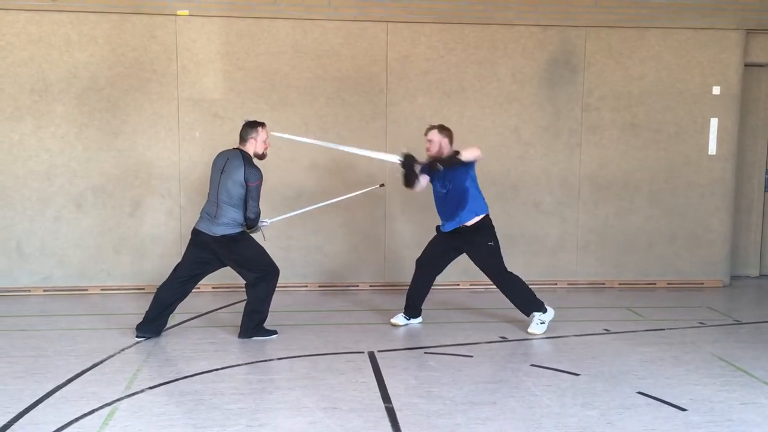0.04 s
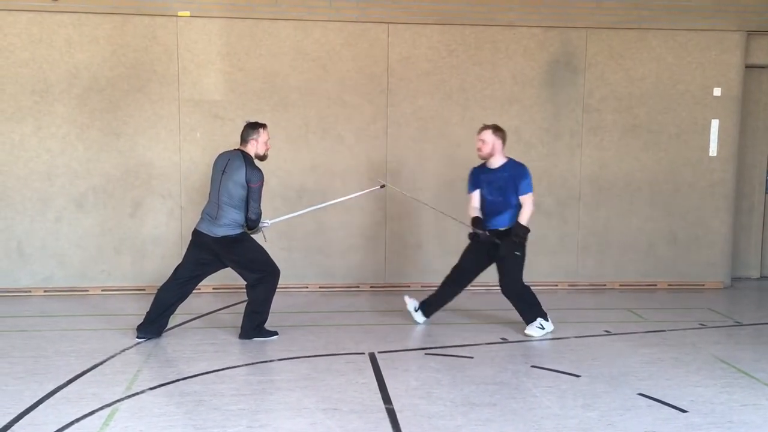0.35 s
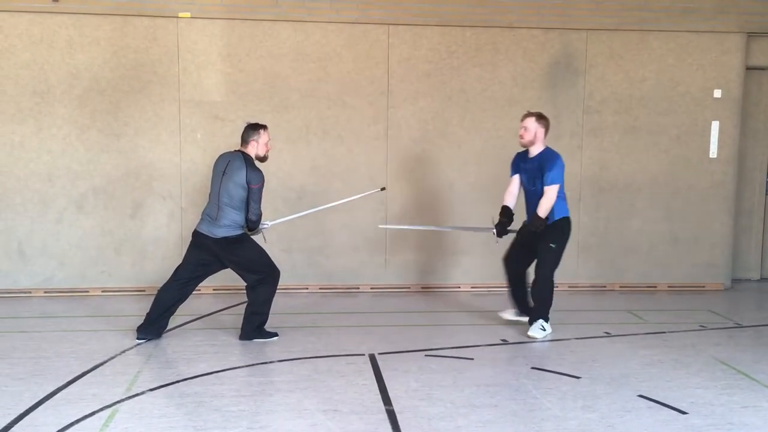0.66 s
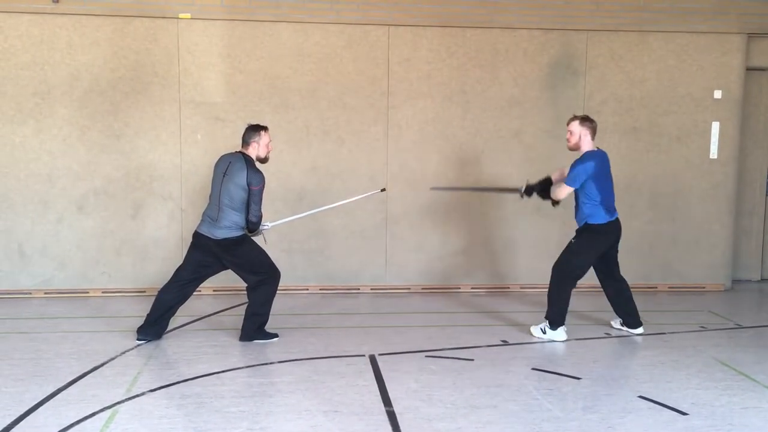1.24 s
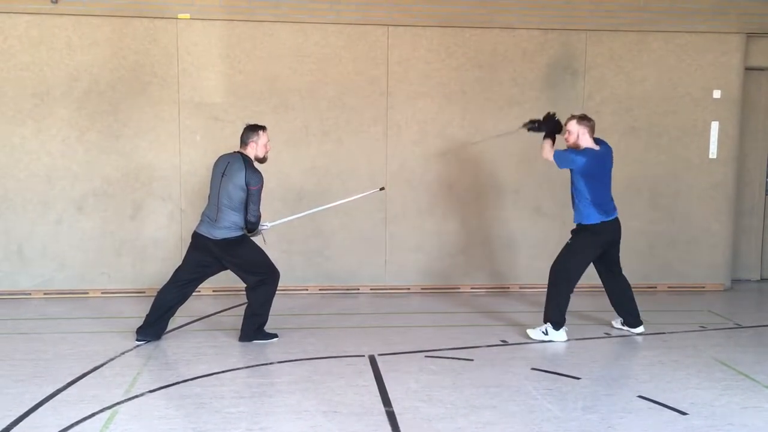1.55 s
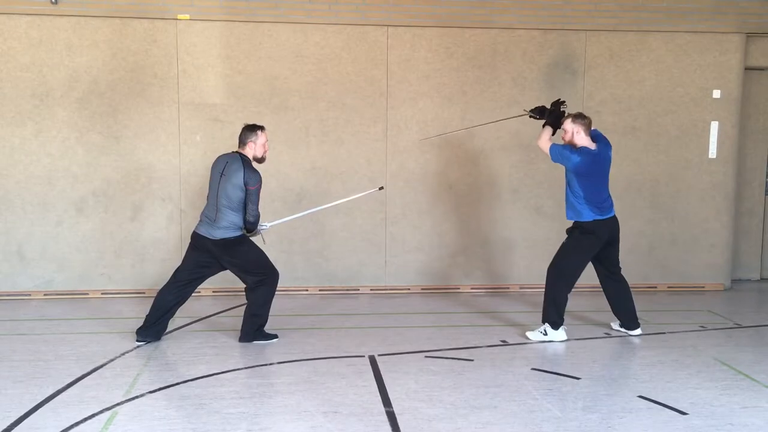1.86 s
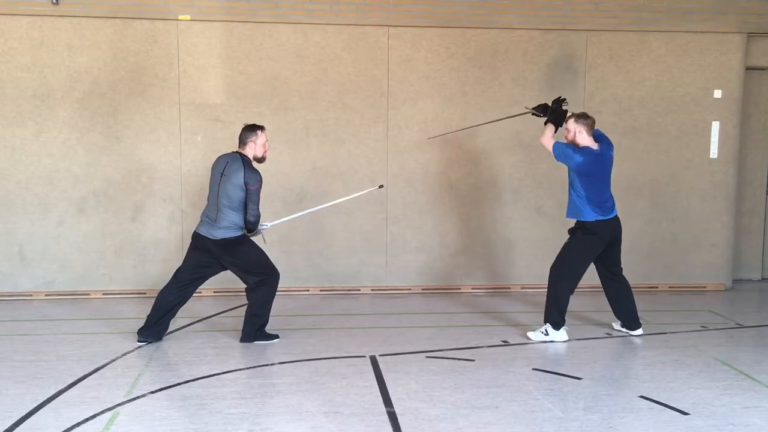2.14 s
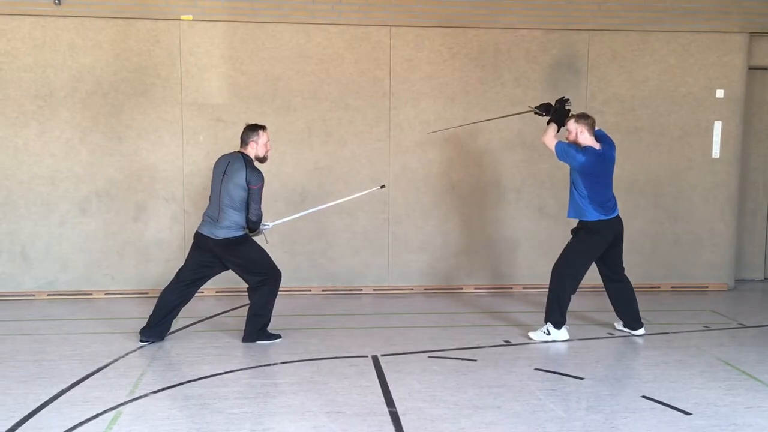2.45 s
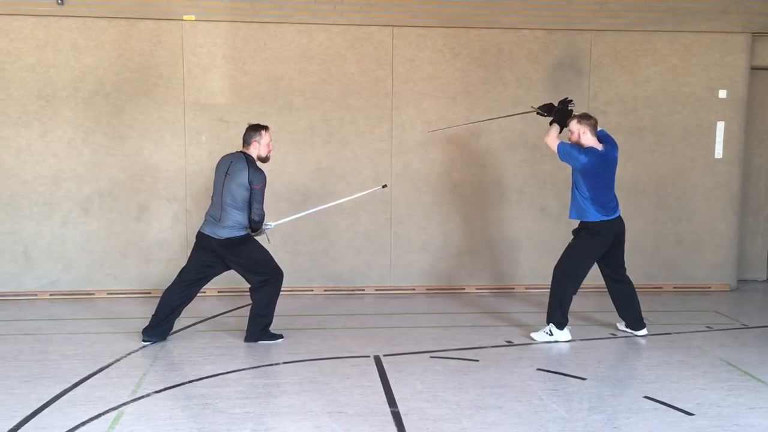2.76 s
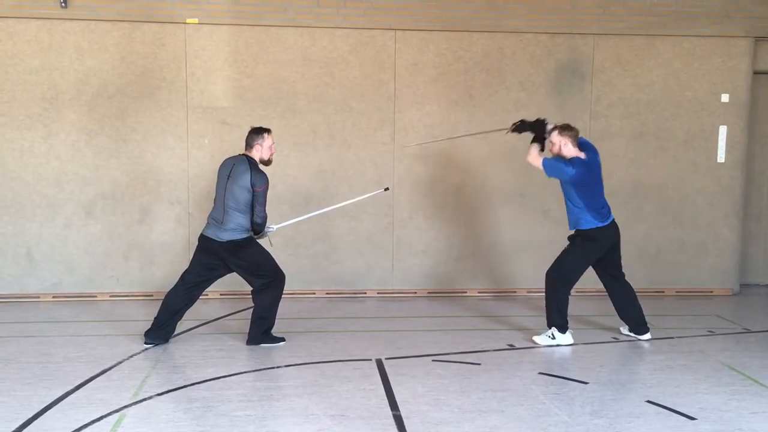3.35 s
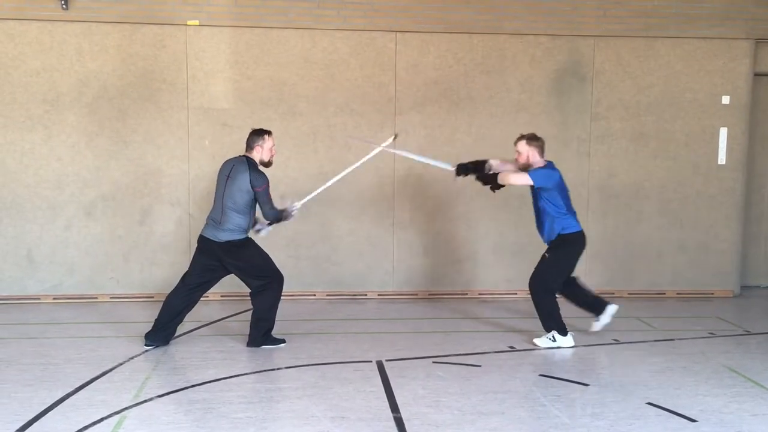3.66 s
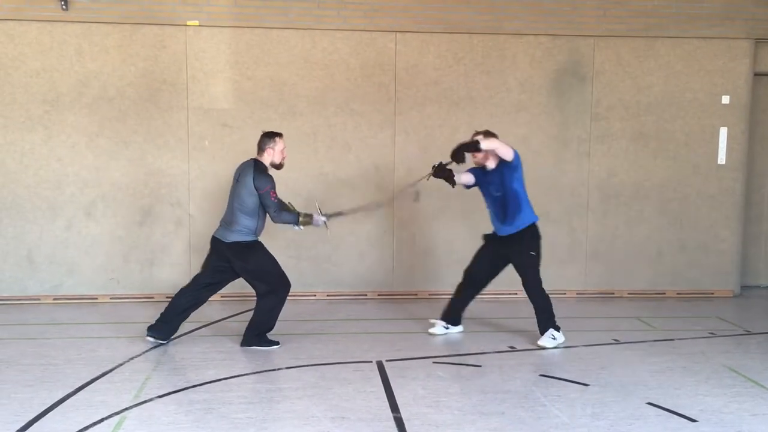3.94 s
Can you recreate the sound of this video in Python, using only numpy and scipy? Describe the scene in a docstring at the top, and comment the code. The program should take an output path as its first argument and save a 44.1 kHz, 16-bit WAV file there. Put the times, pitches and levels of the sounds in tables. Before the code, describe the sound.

Two steel swords clash once, ringing through a gym hall after soft footsteps.

```python
"""Fencing drill in a gym

Two fencers drill with steel swords in a gym hall, where the ventilation hums.
One steps back softly with rustling clothes, waits, then cuts: the blades meet in one bright clash.
The steel rings with many tones at once, and the hall scatters and prolongs the sound."""
import sys
import numpy as np
from scipy import signal
from scipy.fft import rfft, irfft, next_fast_len
from scipy.io import wavfile
from scipy.ndimage import map_coordinates

SR = 44100
rng = np.random.default_rng(int(sys.argv[2]) if len(sys.argv) > 2 else 0)


def transcribe(u):
    """Save the signal u as a 16-bit wav file named by the first command-line argument.

    u: samples, shape (n,) or (channels, n), limited to [-1, 1]; the rate is SR.
    q: integer samples, one column per channel.
    """
    v = np.clip(np.atleast_2d(u).T, -1, 1)
    q = np.round(v * 32767).astype(np.int16)
    wavfile.write(sys.argv[1], SR, q)


N = 176400
CLASH_S, FIRST_WALL_S = 3.8035, 0.009  # when the blades meet; delay of the first echo
CLASH_RIPPLE_DB = 3.5  # peaks and dips of tightly packed resonances


def amp(db):
    """Turn decibels into a gain."""
    return 10 ** (np.asarray(db) / 20)


def unit(x):
    """Scale x to an average (rms) level of 1."""
    return x / np.sqrt(np.mean(np.abs(x) ** 2) + 1e-20)


def along(points, hz):
    """Read a table of (frequency, value) at hz, on a log frequency axis."""
    freqs, values = np.transpose(points)
    return np.interp(np.log(hz + 1), np.log(freqs + 1), values)


def since(s):
    """Seconds since time s at each sample, zero before it."""
    return np.maximum(np.arange(N) / SR - s, 0)


def strike(s, rise_s, t60):
    """Loudness of a hit at time s: a quick rise, and a fade of 60 dB in t60 seconds."""
    return (1 - np.exp(-since(s) / rise_s)) * amp(-60 * since(s) / t60)


def wobble(rate, size=N):
    """A smooth curve through `rate` random values a second."""
    return map_coordinates(rng.standard_normal(2000), [np.arange(size) * rate / SR], mode="mirror")


def filtered(x, response):
    """Scale each frequency in x by response(hz)."""
    size = next_fast_len(N + SR // 2)
    return irfft(rfft(x, size) * response(np.fft.rfftfreq(size, 1 / SR)), size)[:N]


def noise(colour, edge_hz=SR, ripple_db=0, ripple_hz=60.63):
    """Noise of rms 1 shaped by a colour table, duller above edge_hz, with random peaks and dips."""
    bumps = rng.standard_normal(4000)

    def response(hz):
        ripple = ripple_db * map_coordinates(bumps, [hz / ripple_hz], order=1, mode="mirror")
        return amp(along(colour, hz) + ripple) / np.hypot(1, (hz / edge_hz) ** 2)
    return unit(filtered(rng.standard_normal(N), response))


# How long the hall takes to fade by 60 dB: f/Hz, fade time/s
HALL_FADE = [(200, 1.5), (700, 1.55), (2000, 2.24), (4500, 2.04), (8500, 0.7), (12000, .55), (15000, 0.68)]
def hall_fade(x, s):
    """From time s on, each frequency of x dies away at the hall's own rate."""
    hz, t, spectra = signal.stft(x, SR, nperseg=256)
    fade = amp(-60 * np.maximum(t - s, 0) / along(HALL_FADE, hz)[:, None])
    return signal.istft(spectra * fade, SR)[1][:N]


def hall_echo(x):
    """Many reflections blur into one echo with about the same energy as x."""
    tail = hall_fade(rng.standard_normal(N), 0) * (since(FIRST_WALL_S) > 0)
    return signal.fftconvolve(x, tail / np.linalg.norm(tail))[:N]


# Tones of the fan: multiple of its pitch, base level/dB
FAN_TONES = [(1, -59.5), (2, -66), (3, -55), (4, -59.5), (5, -67)]
# Slow swell of the hum: t/s, gain/dB
FAN_SWELL = [(0, -2), (1.6, -0.5), (2.2, 0), (3.1, 0.5), (4, -0.5)]
# Colour of the moving air: f/Hz, relative level/dB
AIR_COLOUR = [(20, -36.5), (38, -10), (55, 0.5), (85, 2.5), (110, 2), (180, 3), (260, 4.5), (350, 1),
              (410, -12.5), (480, -7.5), (560, -3), (680, -11), (810, -5.5), (920, -12), (1130, -5.5),
              (1400, -13), (2050, -15.5), (2450, -14), (3000, -20.5), (4000, -22.5), (5200, -28),
              (7400, -36.5), (8400, -32), (12000, -36.5), (13500, -43), (15800, -61)]
def ventilation(fan_hz=74.85):
    """A fan hums, wavering slightly, over the rush of air."""
    t = since(0)
    hum = np.zeros(N)
    for multiple, db in FAN_TONES:
        peak = np.sqrt(2) * amp(db + 1.02 * wobble(4.4))
        phase = 2 * np.pi * (multiple * fan_hz * t + rng.random())
        hum += peak * np.sin(phase + 0.19 * wobble(3.65))
    swell = amp(np.interp(t, *np.transpose(FAN_SWELL)))
    return hum * swell + amp(-56) * noise(AIR_COLOUR, ripple_db=2.03)


# Body movements: t/s, length/s, level/dB
MOVES = [(.01, 0.064, -69), (0.113, 0.14, -69.5), (0.308, .05, -73), (0.425, 0.16, -75.5), (.63, 0.11, -80),
         (0.984, .13, -67), (1.144, .22, -69.5), (1.38, 0.2, -77), (1.785, 0.11, -68.5),
         (2.487, 0.064, -73.5), (3.163, 0.031, -71), (3.56, 0.062, -68.5), (3.665, 0.21, -76)]
# Colour of rubbing cloth: f/Hz, relative level/dB
CLOTH_COLOUR = [(500, -41), (2000, -13.5), (4000, 1.5), (6500, 1.5), (7400, -5), (8700, 0), (12000, -1.5),
                (13500, -5), (15500, -7)]
def clothes(rise_s=0.023, fall_s=0.038):
    """Fabric slides with each move: a faint, uneven hiss."""
    loudness = sum(amp(db) * (1 - np.exp(-since(s) / rise_s)) * np.exp(-since(s + length) / fall_s)
                   for s, length, db in MOVES)
    return noise(CLOTH_COLOUR) * loudness * amp(0.27 * wobble(65))


# Shoe taps: t/s, level/dB
TAPS = [(0.192, -51.5), (.267, -47.5), (0.873, -60), (1.133, -47.5), (1.192, -55), (1.632, -52.5),
        (3.376, -66)]
# Colour of a tap: f/Hz, relative level/dB
TAP_COLOUR = [(80, 5), (250, -13), (600, 6), (1300, 4.5), (3500, -8.5), (6000, -20.5), (14000, -36)]
# Weight landing on the floor: t/s, level/dB, f/Hz
LANDINGS = [(.3, -50.5, 130), (.62, -53, 79.5), (0.859, -53, 240), (.955, -47.5, 245), (1.135, -48, 139),
            (1.3, -46, 140), (1.66, -48, 75), (2.12, -48, 70.5), (2.19, -54, 65), (3.85, -47.5, 170),
            (3.935, -46, 95)]
# Colour of a thud: multiple of the landing's frequency, relative level/dB
THUD_COLOUR = [(.3, -24), (.7, -9), (1, 16), (1.4, 4.5), (3, -35), (10, -58)]
# Shuffling soles, heard through the hall: t/s, base level/dB
SHUFFLE_LEVELS = [(0, -58.5), (.28, -60.5), (.5, -59), (.85, -60), (1.05, -59.5), (1.17, -56), (1.45, -63),
                  (1.65, -68), (2, -65), (3.3, -64.5), (3.75, -63.5)]
# Colour of the shuffling: f/Hz, relative level/dB
SCUFF_COLOUR = [(100, -13.5), (250, 9.5), (500, -2), (1200, -5), (2500, -16), (5000, -23.5), (12000, -29)]
def footwork():
    """Soft soles tap and shuffle, and the springy floor thuds under the weight."""
    taps = noise(TAP_COLOUR) * sum(amp(db) * strike(s, rise_s=0.00034, t60=0.045) for s, db in TAPS)
    thuds = np.zeros(N)
    for s, db, hz in LANDINGS:
        colour = [(multiple * hz, level) for multiple, level in THUD_COLOUR]
        thuds += amp(db) * noise(colour) * strike(s, rise_s=0.0033, t60=0.32)
    shuffle_db = 0.5 + np.interp(since(0), *np.transpose(SHUFFLE_LEVELS))
    shuffle = noise(SCUFF_COLOUR) * amp(shuffle_db)
    return taps + amp(-0.5) * hall_echo(taps) + thuds + shuffle


# Colour of the first echoes from wall and floor: f/Hz, relative level/dB
EARLY_COLOUR = [(300, -32), (600, -10), (2400, 1), (3500, -1), (5000, -4), (7000, 5), (9000, 1), (12000, 5),
                (14000, 1), (15600, -4)]
# Starting colour of the long echo: f/Hz, relative level/dB
WASH_COLOUR = [(150, -9), (460, -14), (620, -1.5), (1000, -2.5), (1280, -8.5), (1650, -1.5), (2200, -5),
               (3200, -6.5), (3900, -2.5), (4400, -0.5), (4620, -13), (4800, -1), (5400, 1.5), (5750, -5),
               (6200, 4.5), (7400, -1), (7770, -3), (8500, 6), (9700, 6.5), (10400, 0), (11050, 8),
               (11600, 5.5), (12400, 2), (14000, -2), (15500, -10)]
def clash_echo():
    """The nearest walls throw the clash back, then the whole hall answers with a long wash."""
    echo_s = CLASH_S + FIRST_WALL_S
    early = noise(EARLY_COLOUR, ripple_db=CLASH_RIPPLE_DB) * strike(echo_s, rise_s=0.00082, t60=0.2)
    wash = hall_fade(noise(WASH_COLOUR, ripple_db=CLASH_RIPPLE_DB), CLASH_S)
    wash_rise = 1 - np.exp(-since(echo_s) / 0.0064)
    return amp(-28) * early + amp(-25) * wash * wash_rise


# Ringing tones of the two blades: f/Hz, level/dB, fade time before stretching/s
BLADE_TONES = [(853, -46, .8), (974, -46, .8), (1100, -42, .8), (1341, -47, .6), (1703, -48, .7),
               (2007, -44, 1.3), (2473, -42, .6), (2562, -45, .9), (2807, -47, .8), (3088, -44, .9),
               (3539, -46, 1.3), (4034, -45, 1.4), (4155, -44, 1.1), (4497, -45, 1.3), (4721, -44, 1),
               (4982, -42, 1.1), (5011, -42, 1.1), (5123, -41, 1.5), (5515, -47, 1), (6005, -40, .8),
               (6070, -39, .8), (6099, -39, .8), (6653, -47, .9), (6998, -44, .6), (7165, -45, .6),
               (7579, -46, .6), (8115, -42, .7), (8330, -44, .7), (8457, -43, .7), (8560, -41, .6),
               (8858, -43, .6), (9156, -43, .6), (9436, -45, .6), (9645, -42, .6), (9684, -39, .65),
               (9790, -43, .6), (10216, -41, .5), (10751, -31.5, .55), (10795, -36, .55), (11463, -42, .45),
               (11750, -38, .4), (11880, -35, .42), (11927, -34, .6), (12648, -43, .35), (15400, -40, .25),
               (15474, -38, .3)]
def blade_ring(stretch=1.31, build_s=0.011, scatter=0.94, flutter_per_s=110):
    """The steel rings on; reflections join each tone and make it swell and flutter."""
    size = N - round(CLASH_S * SR)
    t = np.arange(size) / SR
    ring = np.zeros(size)
    for hz, db, t60 in BLADE_TONES:
        loudness = (1 - np.exp(-t / build_s)) * amp(-60 * t / (stretch * t60))
        # A complex gain shifts both the strength and the phase of the tone.
        reflections = scatter * (wobble(flutter_per_s, size) + 1j * wobble(flutter_per_s, size))
        steady = np.exp(2j * np.pi * (hz * t + rng.random()))
        tone = np.imag((1 + reflections) * steady) * loudness
        ring += amp(db) * unit(tone) * np.sqrt(np.mean(loudness ** 2))
    return np.pad(ring, (N - size, 0))


# The edges touching: t/s, level/dB, treble edge f/Hz
BLADE_HITS = [(3.8047, -10, 20000), (3.8062, -13, 5400)]
# Colour of each crack: f/Hz, relative level/dB
CRACK_COLOUR = [(60, -43), (300, -28), (480, -19), (620, -7), (1200, -10), (2400, 7.5), (4500, 5),
                (7000, -4), (10000, 3), (13000, 9), (15500, 4.5)]
# Colour of the crash, a crowd of weak, short blade tones: f/Hz, relative level/dB
CRASH_COLOUR = [(60, -42), (150, -18), (300, -15), (480, -29), (600, 16.5), (1100, -2), (1400, -17),
                (2300, 4), (3500, -7), (5000, 3), (7700, -17), (9000, -14), (11000, -11), (12500, 8),
                (14000, 1), (15800, 3)]
def blade_clash(knock_hz=613, bass_cut_hz=514):
    """Edge cracks on edge; the blades bend with a low knock and shake with a short crash."""
    cracks = sum(amp(db) * noise(CRACK_COLOUR, edge_hz) * strike(s, rise_s=0.0002, t60=0.007)
                 for s, db, edge_hz in BLADE_HITS)
    knock = np.sin(2 * np.pi * knock_hz * since(CLASH_S)) * strike(CLASH_S, rise_s=0.0025, t60=0.11)
    crash = noise(CRASH_COLOUR, ripple_db=CLASH_RIPPLE_DB) * strike(CLASH_S, rise_s=0.00091, t60=0.09)
    # The clash carries little sound below about 500 Hz.
    bass_cut = signal.butter(4, bass_cut_hz, "highpass", fs=SR, output="sos")
    return signal.sosfilt(bass_cut, cracks + amp(-33) * knock + amp(-24.5) * crash)


def scene():
    """Everything in the hall, in mono."""
    swords = blade_clash() + clash_echo() + blade_ring()
    return (swords + footwork() + clothes() + ventilation())[None]


def record(dry):
    """Trim away the deepest bass and the highest treble."""
    low_hz, top_hz = 40, 15850
    return filtered(dry[0], lambda hz: (hz < top_hz) / np.hypot(1, (low_hz / (hz + 1)) ** 3))[None]


dry = scene()
out = record(dry)
transcribe(out)
```